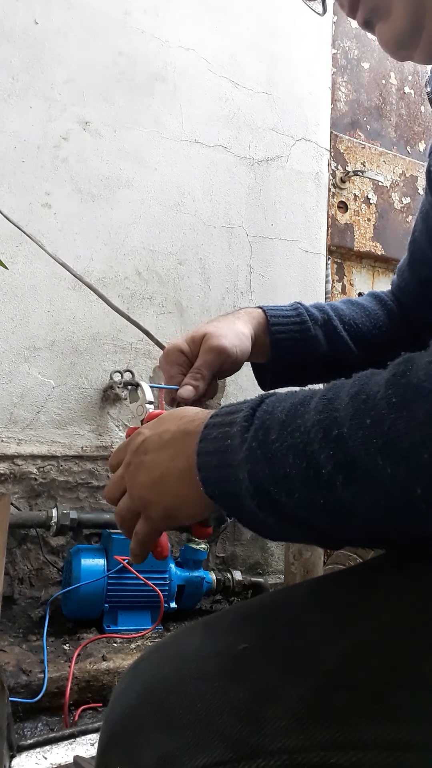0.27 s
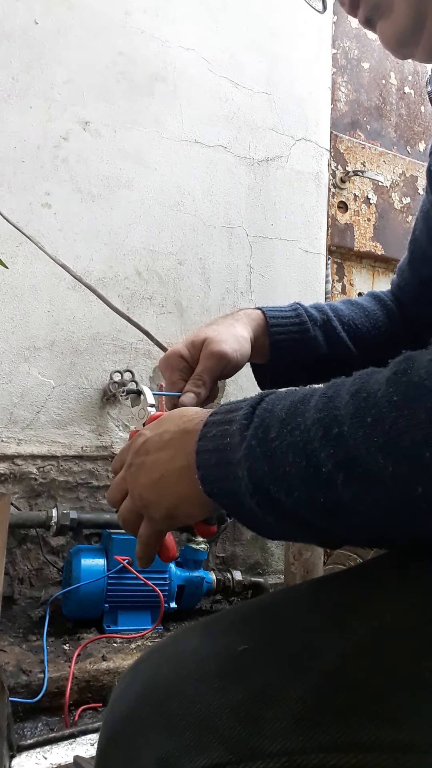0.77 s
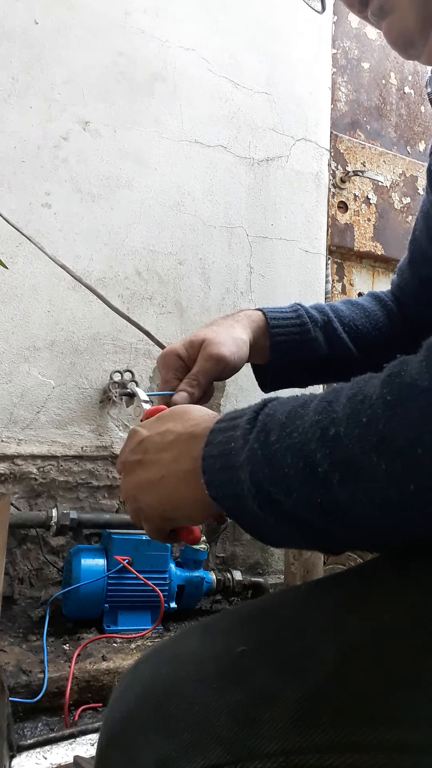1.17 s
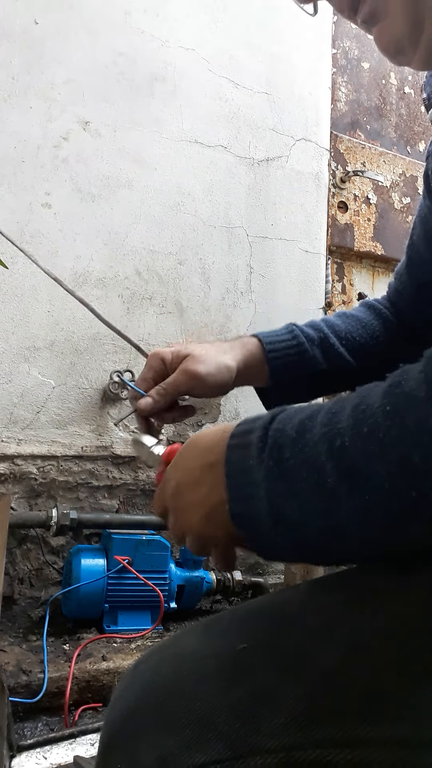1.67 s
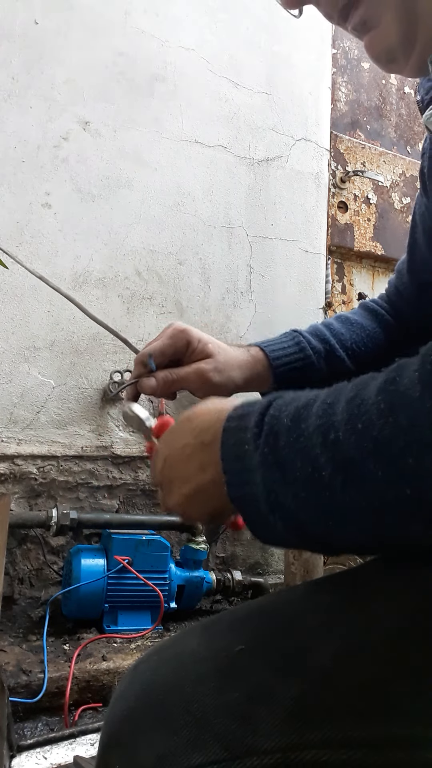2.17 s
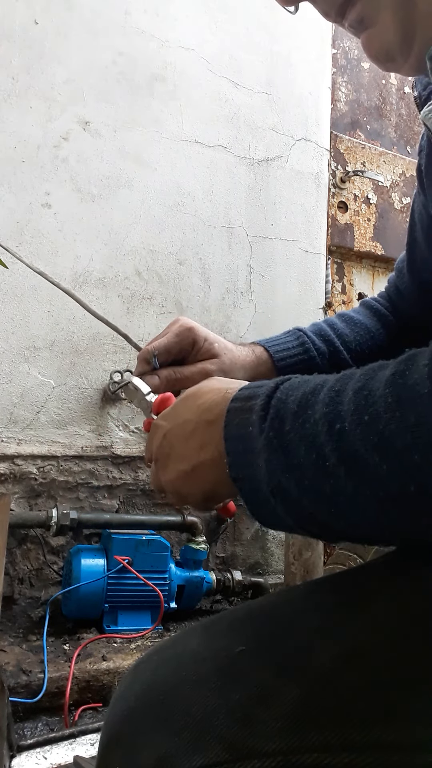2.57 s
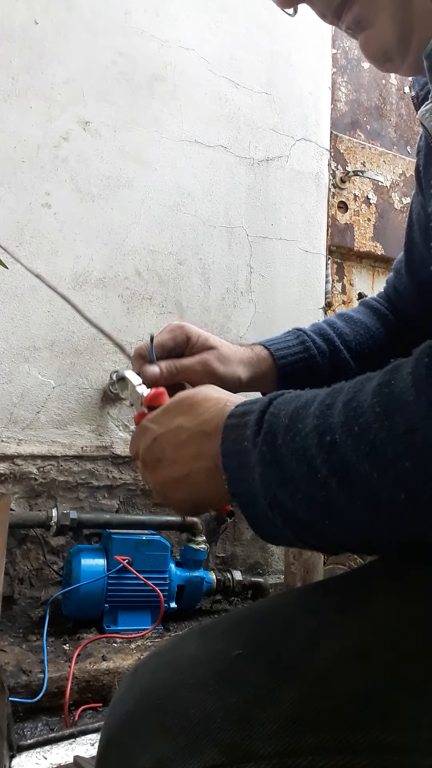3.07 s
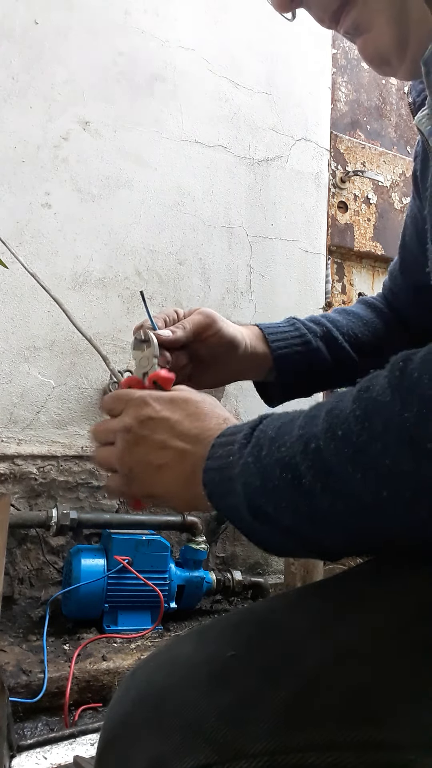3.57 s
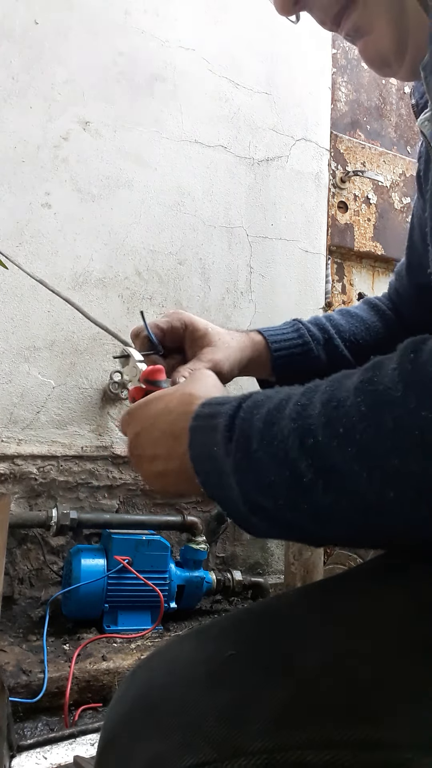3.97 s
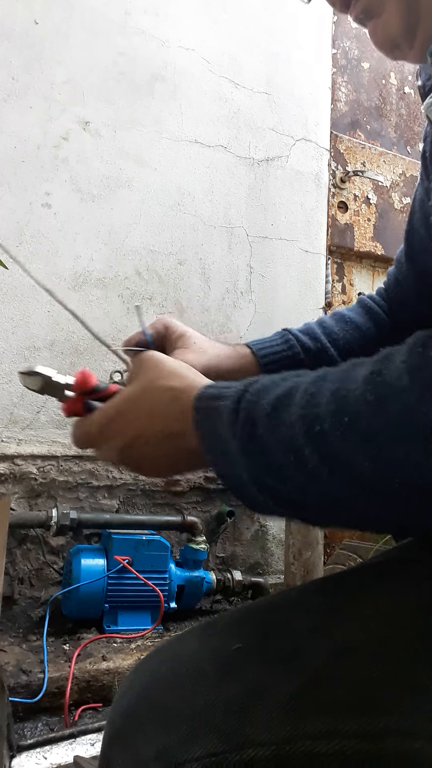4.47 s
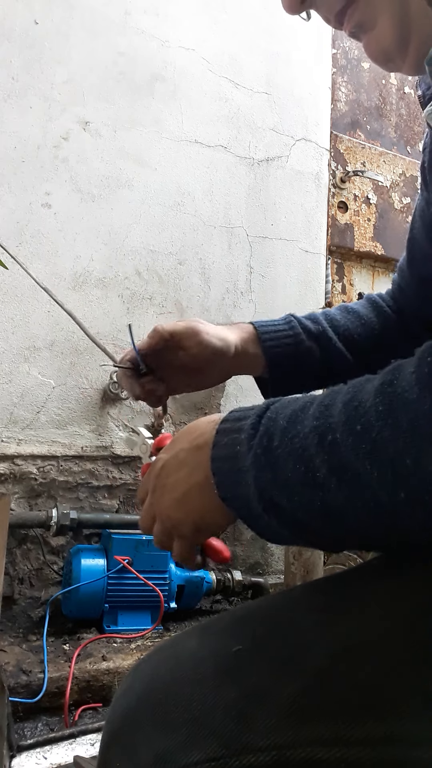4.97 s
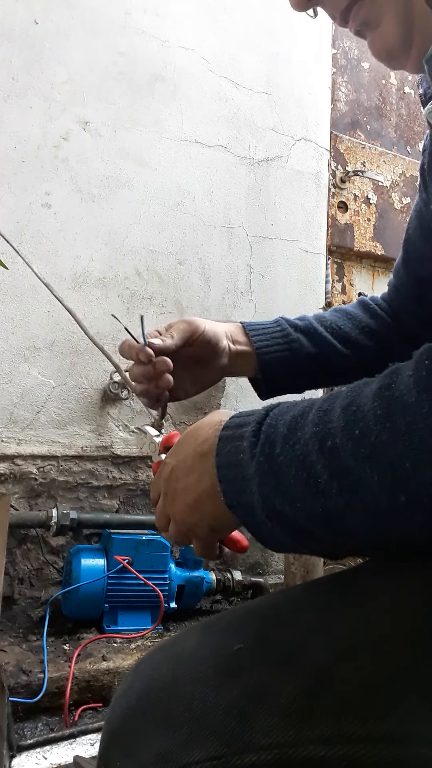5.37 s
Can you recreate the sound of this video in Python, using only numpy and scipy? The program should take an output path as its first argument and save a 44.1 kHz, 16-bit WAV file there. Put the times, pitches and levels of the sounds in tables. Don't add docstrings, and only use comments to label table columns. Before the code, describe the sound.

Over muffled far-off town rumble and faint airy noise, a light metallic tap and soft cloth rubbing lead to a very loud wire cut just after one second. A knock and little landing clicks follow, the ambience briefly sinking. Sparse taps continue, then a busier cluster of clicks around four and a half seconds and quiet scuffs. Close mono phone sound with short wall reflections.

```python
import sys
import numpy as np
from scipy import signal
from scipy.fft import rfft, irfft
from scipy.io import wavfile
from scipy.ndimage import uniform_filter1d, map_coordinates

SR = 44100
rng = np.random.default_rng(int(sys.argv[2]) if len(sys.argv) > 2 else 0)


def ratio(d):
    e = np.asarray(d, float) / 20
    return 10 ** e


def wav_out(sig):
    wavfile.write(sys.argv[1], SR, np.round(np.clip(np.atleast_2d(sig).T, -1, 1) * 32767).astype(np.int16))


N = 248283

DUCK_AT_S, DUCK_FALL_S, DUCK_HOLD_S, DUCK_RELEASE_S = 1.27, 0.41, 0.65, 0.51
DUCK_DB, DUCK_SAG_DB = 9, 0.7
AIR_DB, AIR_FOLLOWS = -43, 0.55
BODY_SHARE = 0.35
BLUNT_HZ = 9000
TOP_HZ = 15760

# time in seconds, level in dB.
TOWN_LEVEL = [(0.0, -41.5), (0.7, -40.5), (3.1, -39.5), (5.06, -39), (5.63, -41.5)]
# frequency in Hz, level in dB.
RUMBLE_TONE = [(18, -80.5), (30, -22), (50, -12.5), (90, -3.5), (200, -8.5), (350, -7.5), (450, -16.5),
               (700, -24), (1200, -62)]
# frequency in Hz, level in dB.
AIR_TONE = [(250, -37.5), (450, 6.5), (1000, 5.5), (2000, -11), (3300, -22), (5000, -21.5), (7500, -18),
            (9000, -34.5), (12000, -31)]
# time in seconds, level in dB.
RUSTLE_LEVEL = [(0.0, -62), (0.19, -68.5), (0.58, -63), (0.86, -71.5), (1.1, -75), (1.65, -71), (1.75, -74),
                (2.6, -74), (2.86, -73.5), (3.12, -68.5), (3.28, -74), (4.2, -72.5), (4.56, -67.5),
                (4.67, -70), (4.85, -74), (5.03, -66.5), (5.3, -76), (5.63, -74.5)]
# frequency in Hz, level in dB.
CLOTH_TONE = [(1500, -34), (3500, -9), (6000, -4), (9500, -9), (11000, 0), (16000, 4.5)]
# time in seconds, pitch in Hz, level in dB.
SQUEAK = [(1.092, 1780, -63.5), (1.104, 1920, -35.5), (1.113, 2420, -47), (1.125, 2920, -43),
          (1.135, 3060, -60)]

# start in seconds, peak in dB, pitch in Hz, time to fade by 60
# dB in seconds.
PINGS = [(0.159, -25.5, 2950, 0.13), (0.174, -22, 2925, 0.069), (1.9999, -32.5, 2915, 0.048),
         (2.0128, -32, 2885, 0.051),
         (0.162, -38.5, 6560, 0.089), (0.165, -40.5, 7110, 0.094), (2.91, -23, 2844, 0.031),
              (2.922, -31.5, 2920, 0.04), (3.806, -40, 5370, .03), (4.2085, -23, 2180, 0.012),
              (4.426, -34, 2900, 0.047), (4.549, -41, 12000, .05), (3.712, -45, 6320, 0.097),
              (4.209, -51, 12100, .02), (1.275, -18.5, 3050, .05), (1.289, -15.5, 3006, .07),
              (4.592, -31.5, 7050, 0.021), (5.146, -39.5, 4820, 0.038)]
# pitch in Hz, level in dB, time to fade by 60 dB in seconds.
CUT_RING = [(1731, 0, 0.21), (3010, -4, 0.161), (3880, -21.5, 0.13), (5000, -9, 0.11), (5300, -13.5, 0.12),
            (5600, -28, 0.11), (5990, -31, 0.27), (6345, -20.5, 0.195)]
PULL_RING = [(1510, -1.5, 0.043), (2248, 2, 0.073), (2950, -10, 0.15), (3690, -21, 0.15),
             (5370, 0.5, 0.037)]
# start in seconds, level in dB, the ring's pitches as above.
RINGS = [
    (1.274, -13.5, CUT_RING),
    (1.405, -57, CUT_RING),
    (4.546, -24, PULL_RING),
]

# start in seconds, peak in dB near 4.5 kHz,
# body in dB (heavier contact), edge in dB (sharper contact). The next four tables share these columns.
SHEAR = [
    (1.2725, -8.5, -5.5, 2),
    (1.2752, -8.5, 2.4, -11),
    (1.2894, -11, -3, 1.5),
]
KNOCKS = [
    (1.4052, -10.5, -10.5, -2.5),
    (3.7042, -35, 8.5, 10.5),
    (4.209, -43, 2, 0),
    (4.4118, -30.5, -2, -10),
]
SLAPS = [(0.1581, -33, -17, -20), (1.5297, -20, -6, 4.5), (1.9976, -47, -1, -30), (2.8908, -36, 7.5, 14.5),
         (2.9016, -48, -5, 28), (4.358, -36.5, 3, 1), (4.3971, -40, 6, 7), (4.5458, -25, -4.5, 12),
         (4.5744, -33.5, -12, 4)]
CLICKS = [(1.558, -22, -18, 2), (1.627, -44, -18, 1), (2.0914, -63, 9, 3), (3.0504, -60, 9, 10),
          (3.4465, -45, 0, 0), (4.5463, -31, -8, 2), (4.5675, -34, -14, 21), (4.6185, -41, 3, -10),
          (4.6375, -37, 4, -17)]
SCUFFS = [(0.402, -51, 22, 6.5), (0.5224, -39.5, 9, -3), (0.534, -49, 7, 7.5), (0.5824, -47.5, 9, -3),
          (1.0525, -45, 5.5, -5.5), (2.2368, -60.5, -4.5, -11), (2.924, -51, 3, 4.5),
          (2.9967, -63, 0.1, 5.5), (3.4481, -47, -3, -6), (3.5074, -51.5, 3, 1), (3.8114, -51.5, -10, -2),
          (3.8244, -59, -1, 5.5), (4.9008, -57, 5, 5), (4.9563, -51.5, 0, 2.5), (4.976, -56, -3, -7),
          (4.9994, -58, 0.1, -2.5), (5.0383, -58.5, -1.5, 7.5), (5.0594, -64, -1.5, 1.5),
          (5.4414, -59, 0.1, -1)]
# its table, rise in seconds, time to fade by 60 dB in seconds,
# first spike in dB, yard answer in dB, colour in dB at 1.6, 3, 6.7 and 12 kHz,
# share of the edge that reaches 6.7 kHz.
KINDS = [
    (SHEAR, 0.00027, 0.028, -7.5, -5.5, (0.9, -11, -5, -15), 0.83),
    (KNOCKS, 0.00049, 0.038, 1.5, -20, (14.5, -1, -10, -20), 1.4),
    (SLAPS, 0.00033, 0.048, -5, -15, (4, -1.5, 0.3, -11), 0.15),
    (CLICKS, .0002, .012, 10, -19, (-4, -3, -9, -8), .7),
    (SCUFFS, 0.0025, 0.21, -36, -11, (-13, -3, 0.5, -1.5), .8),
]
# start in seconds, peak in dB.
THUDS = [
    (1.531, -34.5),
    (1.557, -45),
    (2.889, -34),
    (2.909, -37),
]
# low edge in Hz, high edge in Hz.
BANDS = [(3500, 5600), (1100, 2200), (2300, 3500), (5600, 7700), (7700, 17000), (400, 1150)]

# centre in Hz,
# width in Hz, level in dB.
CAVITY = [(213.4, 69, 12.5), (101.2, 82, 5.5), (1646, 710, 21), (2950, 1200, 23), (3500, 360, -5.5),
          (4723, 1050, 18.5), (6600, 1400, 10.5), (8550, 890, 0.5),
          (11600, 2600, 5), (13900, 1000, -1.5), (15400, 1400, 6.5)]


def unit(x):
    return x / np.sqrt(np.mean(x ** 2) + 1e-20)


def curves(rows):
    seconds, *columns = np.transpose(rows)
    return [np.interp(np.arange(N) / SR, seconds, column) for column in columns]


def wobble(rate):
    points = rng.standard_normal(int(N * rate / SR) + 4)
    return map_coordinates(points, [np.arange(N) * rate / SR])


def cavity(x):
    size = 8192
    hz = np.fft.rfftfreq(size, 1 / SR)
    db = sum(peak / (1 + (2 * (hz - centre) / width) ** 2) for centre, width, peak in CAVITY)
    cepstrum = irfft(np.log(ratio(db)))
    cepstrum[1:size // 2] *= 2
    cepstrum[size // 2 + 1:] = 0
    response = irfft(np.exp(rfft(cepstrum)))[:size // 2]
    return signal.fftconvolve(x, response)[:len(x)]


def hiss(tone, patchy_db):
    z = signal.stft(rng.standard_normal(N + SR), nperseg=512)[2]
    patches = uniform_filter1d(rng.standard_normal(z.shape), size=6, axis=0)
    patches = uniform_filter1d(patches, size=10, axis=1)
    noise = signal.istft(z * ratio(patchy_db * unit(patches)), nperseg=512)[1]
    tone_hz, tone_db = np.transpose(tone)
    hz = np.fft.rfftfreq(len(noise), 1 / SR)
    gain = ratio(np.interp(np.log(hz + 1), np.log(tone_hz), tone_db, left=-120))
    coloured = irfft(rfft(noise) * gain, len(noise))
    return unit(cavity(coloured)[:N])


def ducking():
    corners = np.cumsum([DUCK_AT_S, DUCK_FALL_S, DUCK_HOLD_S, DUCK_RELEASE_S])
    return np.interp(np.arange(N) / SR, corners, [0, -DUCK_DB, -DUCK_DB - DUCK_SAG_DB, 0])


def yard():
    town_db, gain_db = curves(TOWN_LEVEL)[0], ducking()
    air_db = AIR_DB + AIR_FOLLOWS * (town_db - town_db.mean())
    drift = wobble(2.87)
    rumble = ratio(town_db + gain_db + 0.63 + 0.38 * drift) * hiss(RUMBLE_TONE, patchy_db=0.35)
    air = ratio(air_db + gain_db + 0.77 * drift) * hiss(AIR_TONE, patchy_db=0.78)
    return rumble + air


def sleeves():
    lumps = ratio(0.7 * wobble(40) + 1.2 * wobble(400))
    cloth = hiss(CLOTH_TONE, patchy_db=0.7)
    return ratio(curves(RUSTLE_LEVEL)[0] + ducking() + 7.5) * unit(lumps * cloth)


def joint():
    hz, db = curves(SQUEAK)
    roughness = 0.17 * np.cumsum(rng.standard_normal(N))
    phase = 2 * np.pi * np.cumsum(hz) / SR + roughness
    return ratio(db) * (db > -59.5) * np.sin(phase)


def steel():
    out = np.zeros(N + SR)
    t = np.arange(SR // 2) / SR
    strikes = RINGS + [(start, db, [(hz, 0, t60)]) for start, db, hz, t60 in PINGS]
    for start, db, modes in strikes:
        for hz, level_db, t60 in modes:
            shake = 0.038 * hz / 3000 * np.cumsum(rng.standard_normal(len(t)))
            fade = ratio(db + level_db - 60 * t / t60)
            onset = 1 - np.exp(-t / 0.0013)
            out[round(start * SR):][:len(t)] += fade * onset * np.sin(2 * np.pi * hz * t + shake)
    return out[:N]


def burst(t, t60, rise, spike_db, yard_db):
    crack = ratio(-60 * t / t60) * (1 - np.exp(-t / rise))
    wall = ratio(yard_db - 6 - 60 * (t - 0.0135) / 0.062) * (t > 0.0135)
    band_t60 = np.array([[0.19], [0.25], [0.19], [0.17], [0.2]])
    tail = ratio(yard_db - 60 * t / band_t60) + ratio(yard_db - 24 - 60 * t / 0.45)
    tail = tail * (1 - np.exp(-t / 0.00093))
    grit_db = 3 * np.repeat(rng.standard_normal(len(t) // 50 + 1), 50)[:len(t)]
    sound = (crack + wall + tail) * ratio(grit_db) * rng.standard_normal(len(t))
    sound[:, 12] += 4 * ratio(spike_db)
    return sound


def contacts():
    t = np.arange(SR // 2) / SR
    tracks = np.zeros((len(BANDS), N + SR))
    for table, rise, t60, spike_db, yard_db, kind_db, edge_share in KINDS:
        for start, db, body_db, edge_db in table:
            bands_db = np.add(kind_db, [body_db, BODY_SHARE * body_db, edge_share * edge_db, edge_db])
            colour = ratio(db - 10 + np.array([0, *bands_db]))[:, None]
            sound = burst(t, t60, rise, spike_db, yard_db)
            tracks[:-1, round(start * SR):][:, :len(t)] += colour * sound
    for start, db in THUDS:
        thud = ratio(db - 5.5 - 60 * t / 0.16) * rng.standard_normal(len(t))
        tracks[-1, round(start * SR):][:len(t)] += thud
    out = np.zeros(N)
    blunt_push = np.exp(-2 * np.pi * BLUNT_HZ * t[:SR // 4])
    for track, band in zip(tracks, BANDS):
        sos = signal.butter(4, band, "bandpass", fs=SR, output="sos")
        heard = cavity(signal.sosfilt(sos, blunt_push))
        out += signal.fftconvolve(track, heard / np.linalg.norm(heard))[:N]
    return out


def scene():
    return (yard() + sleeves() + joint() + steel() + contacts())[None]


def top_cut(x):
    return signal.sosfilt(signal.butter(12, 17000, fs=SR, output="sos"), x)


def record(dry):
    passed = np.fft.rfftfreq(N, 1 / SR) < TOP_HZ
    mix = irfft(rfft(dry) * passed, N)
    return top_cut(mix)


dry = scene()
out = record(dry)
wav_out(out)
```